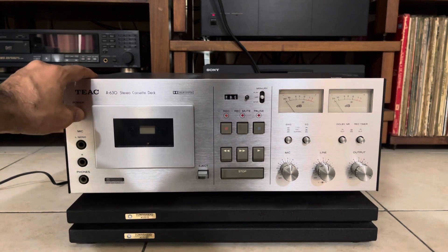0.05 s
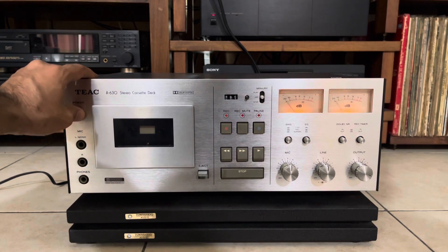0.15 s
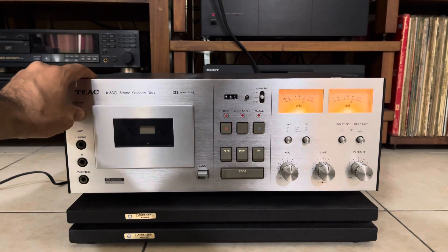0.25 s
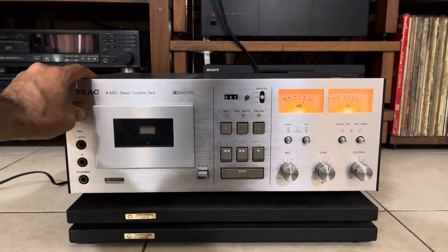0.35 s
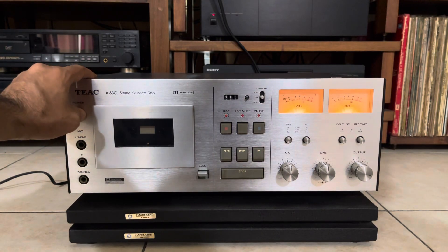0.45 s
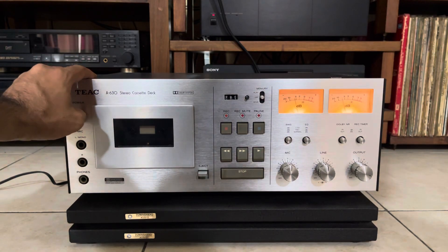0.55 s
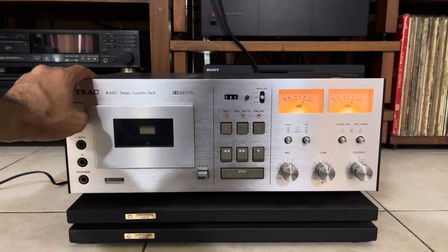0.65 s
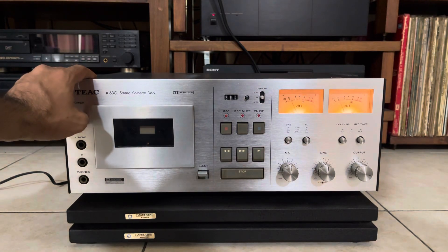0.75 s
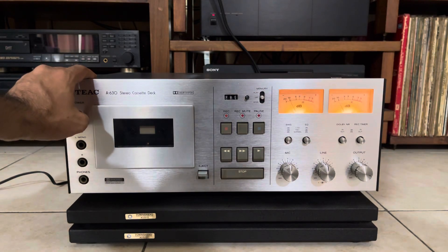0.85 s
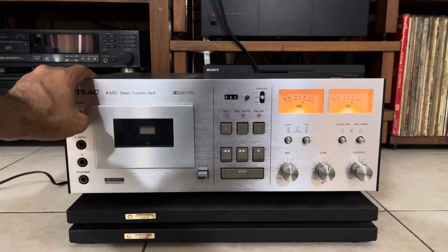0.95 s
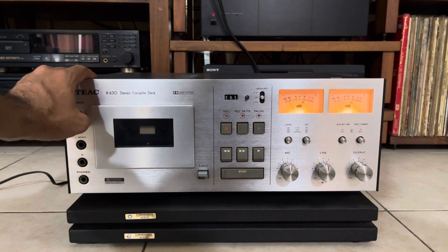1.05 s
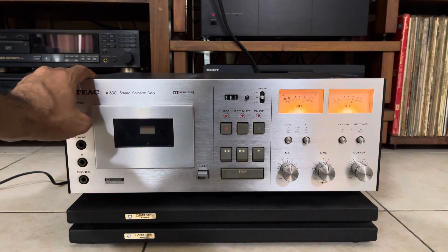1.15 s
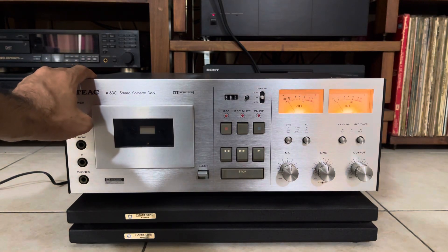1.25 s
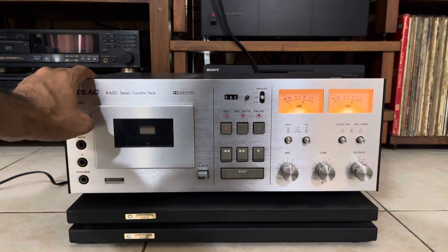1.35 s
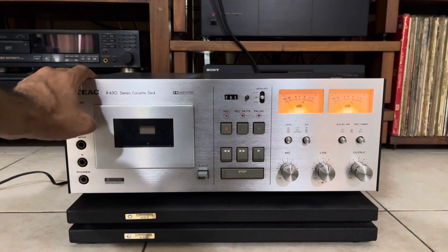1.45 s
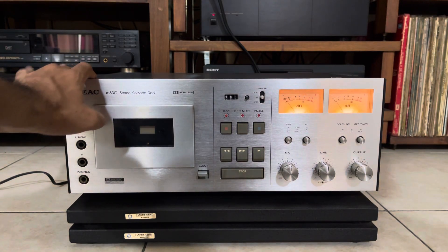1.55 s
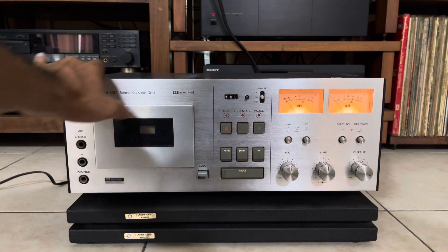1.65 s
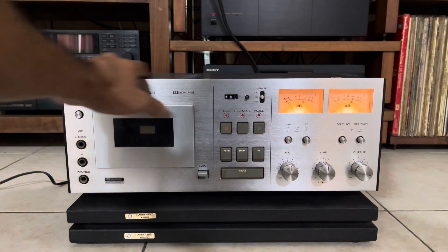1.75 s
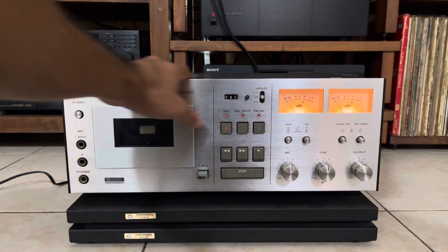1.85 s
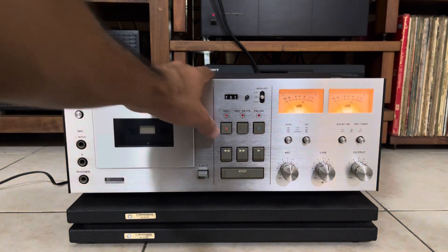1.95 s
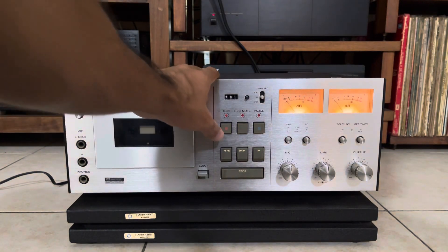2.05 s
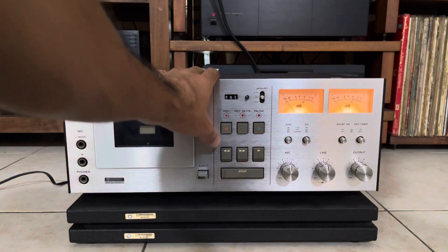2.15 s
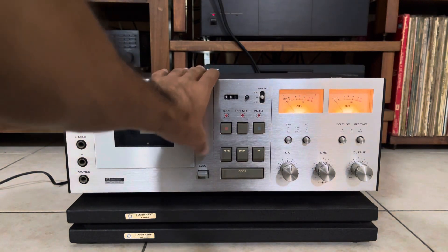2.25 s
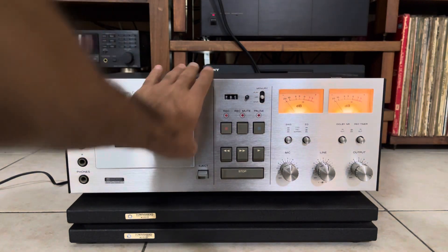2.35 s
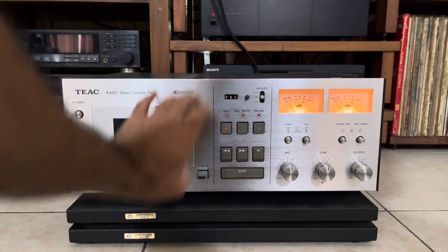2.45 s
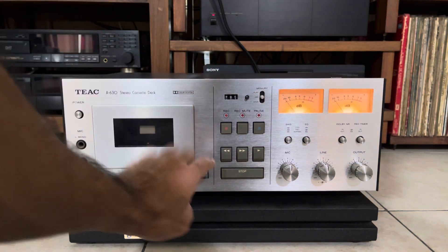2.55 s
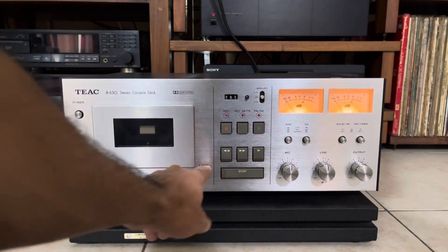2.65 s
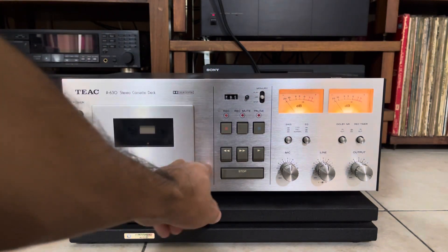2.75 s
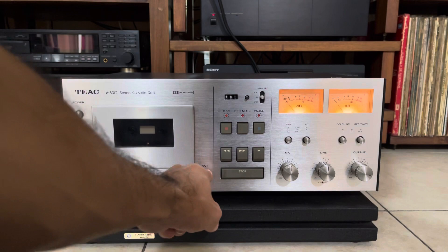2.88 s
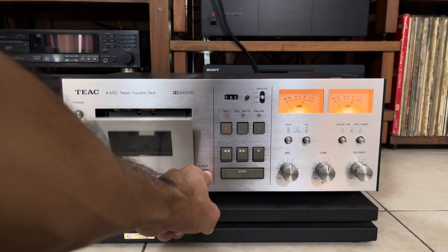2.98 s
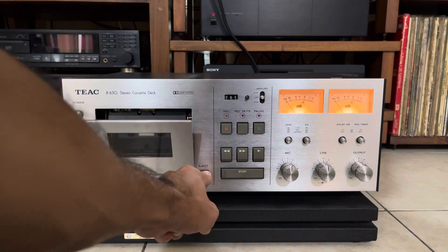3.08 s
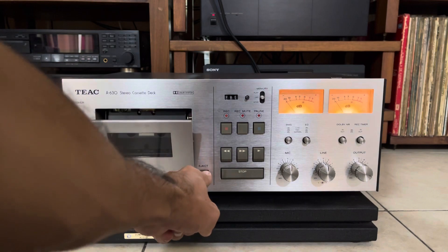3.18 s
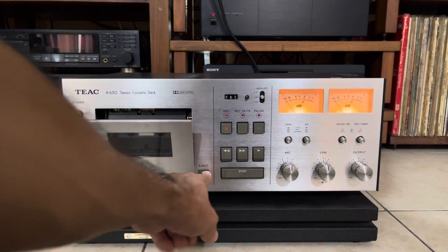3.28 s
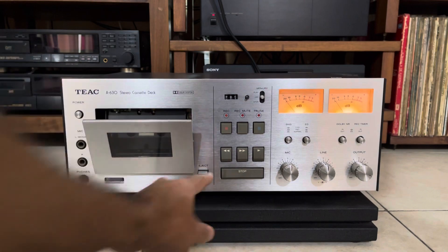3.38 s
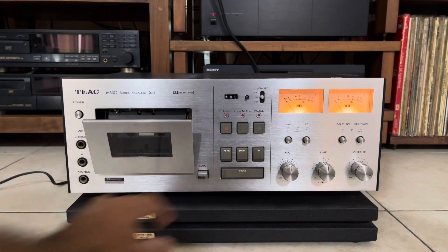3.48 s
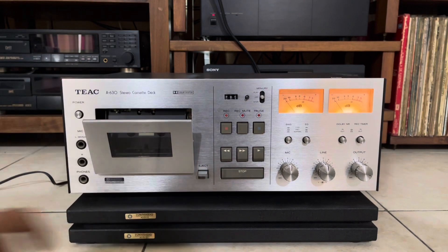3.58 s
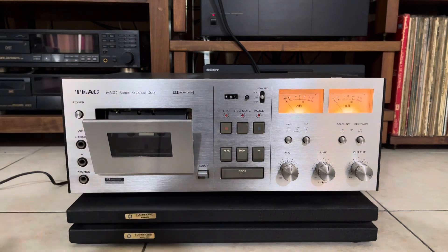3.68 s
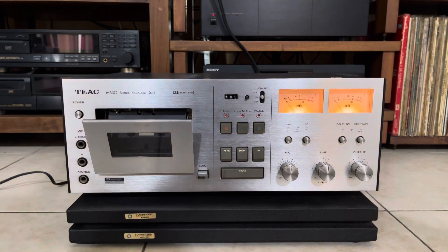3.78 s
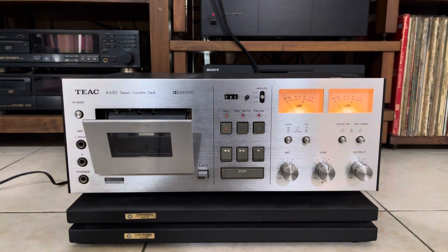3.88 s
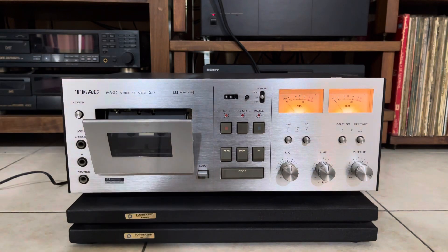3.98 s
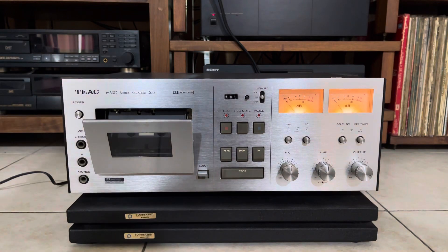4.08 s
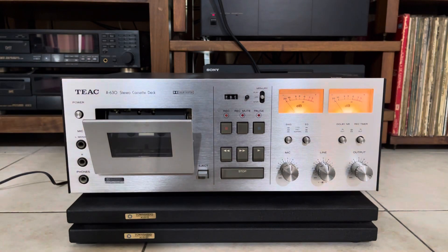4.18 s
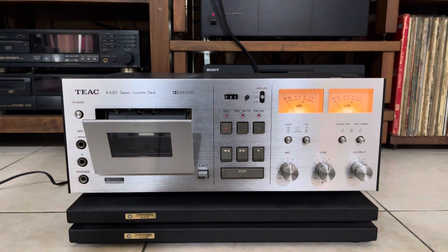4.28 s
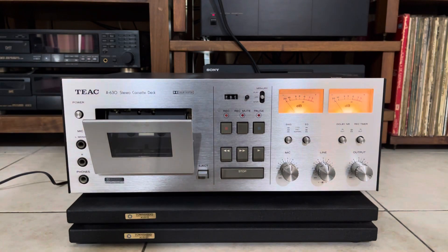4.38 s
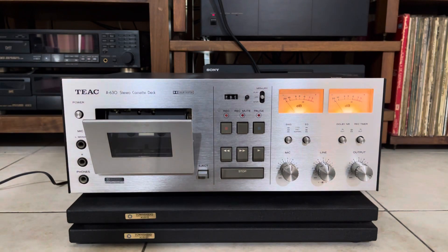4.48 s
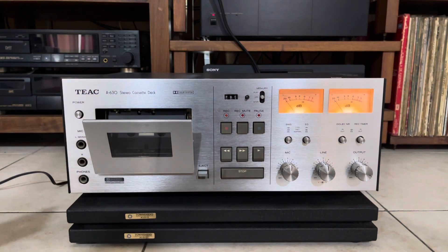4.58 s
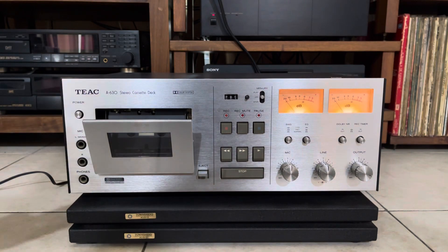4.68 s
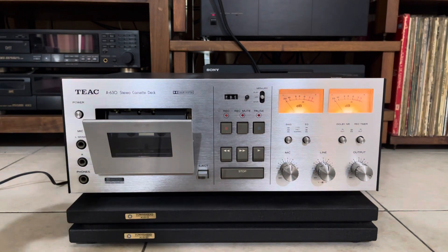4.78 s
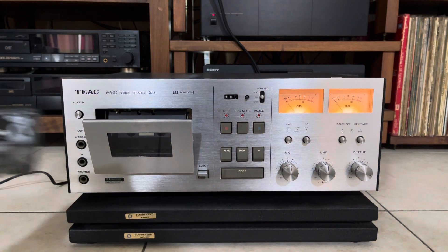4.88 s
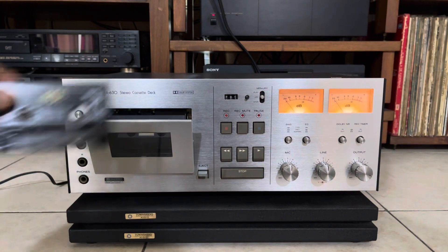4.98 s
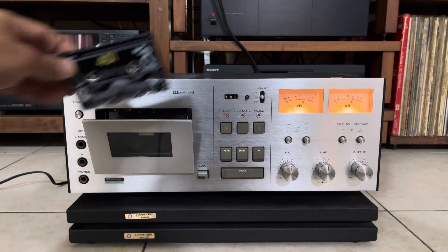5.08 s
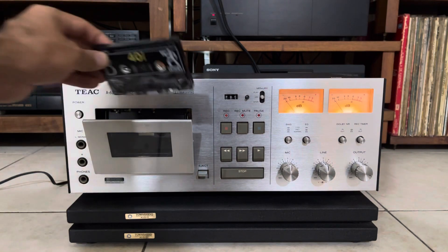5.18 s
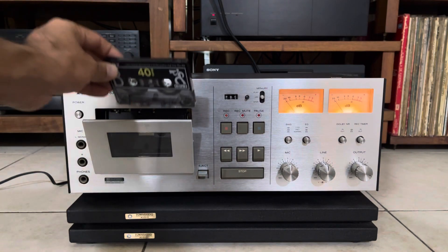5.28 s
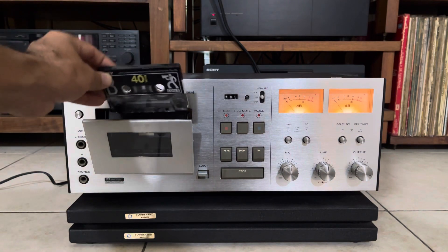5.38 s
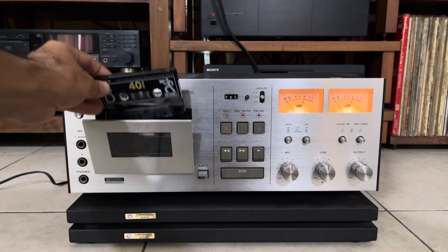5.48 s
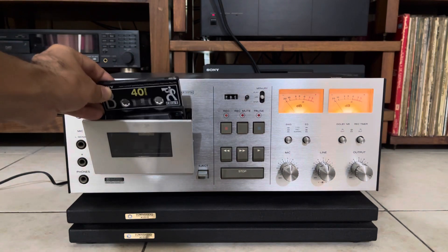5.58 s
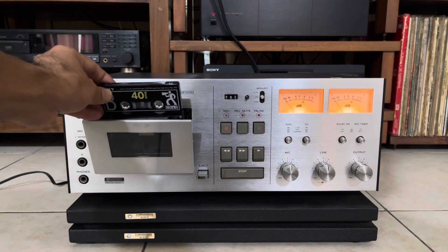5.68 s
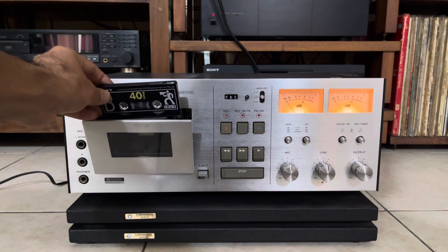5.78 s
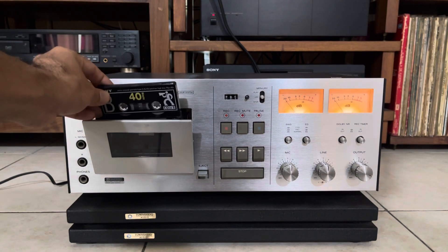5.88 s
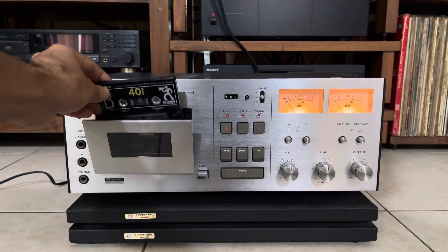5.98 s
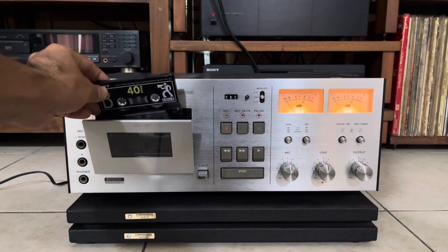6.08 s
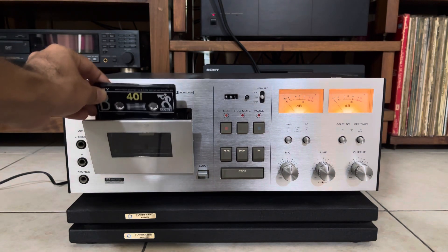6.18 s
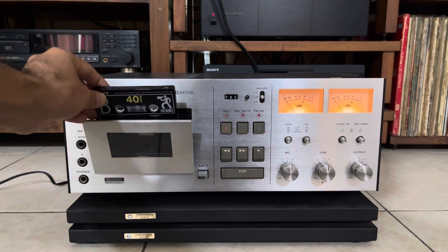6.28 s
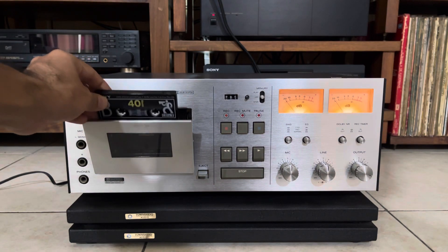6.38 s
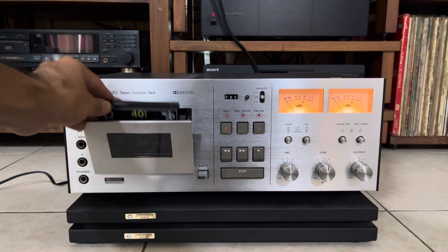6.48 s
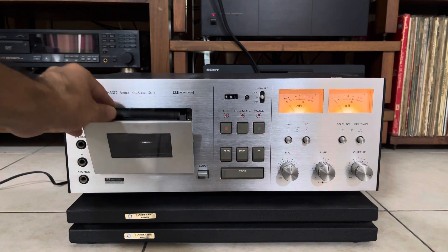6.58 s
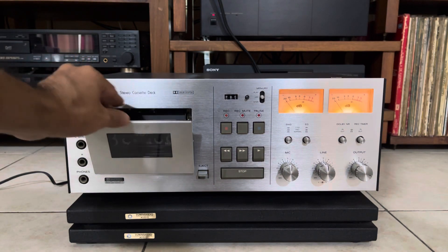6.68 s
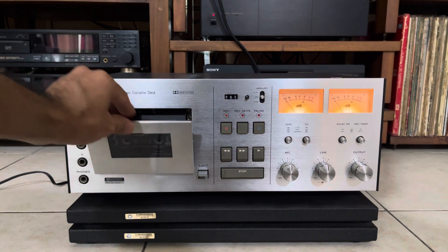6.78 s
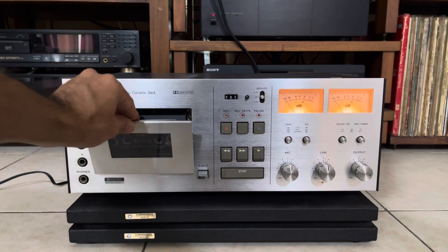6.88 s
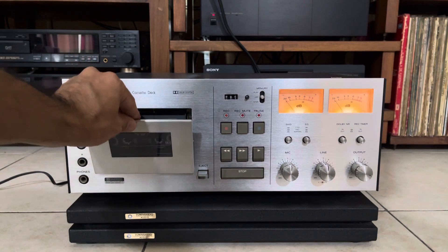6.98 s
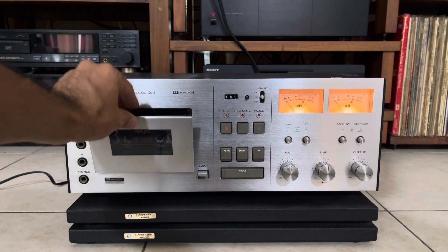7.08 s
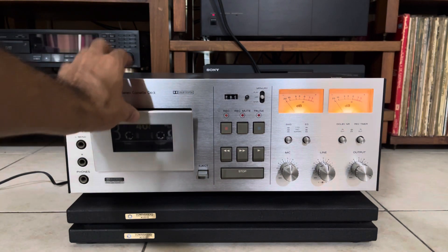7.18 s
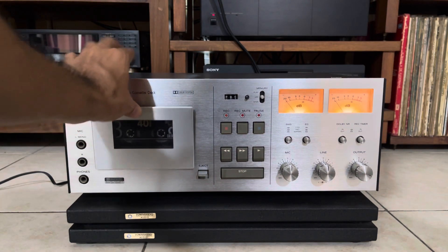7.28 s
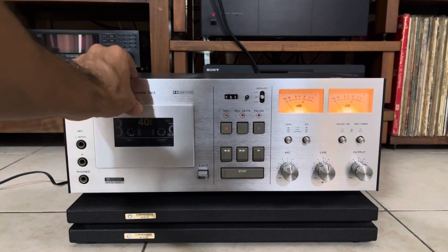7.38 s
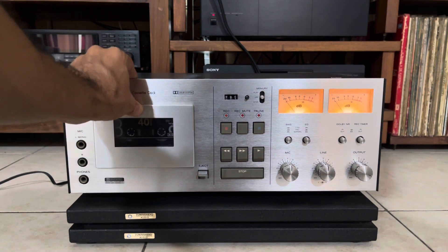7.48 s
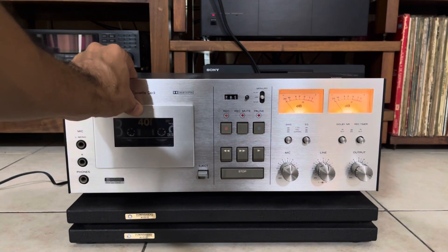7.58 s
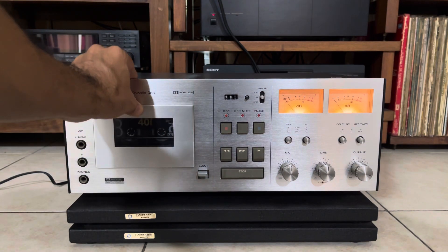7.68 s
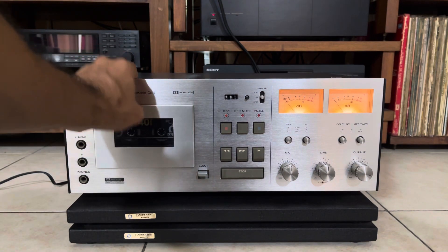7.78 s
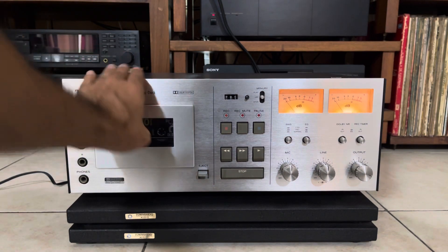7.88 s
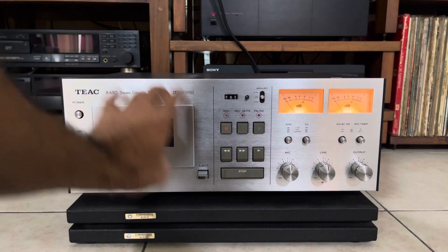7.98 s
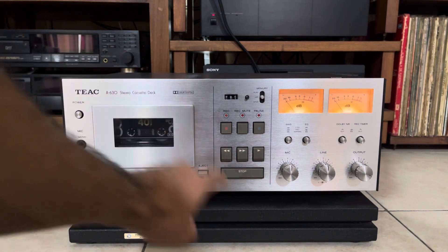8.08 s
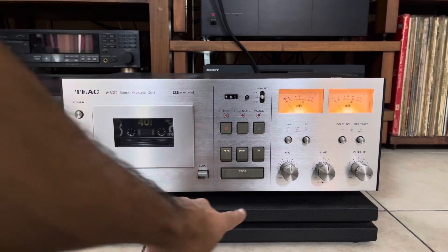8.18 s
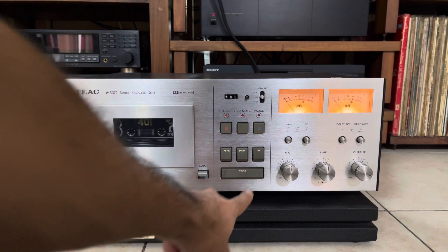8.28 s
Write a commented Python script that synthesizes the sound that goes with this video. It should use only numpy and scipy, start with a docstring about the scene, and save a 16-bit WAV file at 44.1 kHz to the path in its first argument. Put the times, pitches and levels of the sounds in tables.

```python
"""Air handling, building rumble and microphone hiss, all band-shaped noise, run throughout a quiet tiled room.
The power switch of a cassette deck clicks, low bumps begin and fingers brush the panel; the door unlatches
and drops open with a damper's whirr. A cassette rattles, knocks and slides into the holder, the door snaps
shut, and a last brush and bumps follow. Contacts and slides are noise through damped resonances, pings and
bumps are decaying sines; the contacts and slides also reverberate, and all is heard by a close stereo pair."""
import sys
import numpy as np
from scipy import signal
from scipy.fft import rfft, irfft, next_fast_len
from scipy.io import wavfile
from scipy.ndimage import uniform_filter1d, map_coordinates

SR = 44100
rng = np.random.default_rng(int(sys.argv[2]) if len(sys.argv) > 2 else 0)


def master_out(mix):
    """Clip the mix to full scale and print it as 16-bit PCM to the path in sys.argv[1]."""
    frames = np.transpose(np.atleast_2d(mix))
    ceiling = np.clip(frames, -1, 1)
    pcm = np.round(ceiling * 32767).astype(np.int16)
    wavfile.write(sys.argv[1], SR, pcm)


N = 368058  # length in samples


def amp(db):
    """Level as an amplitude ratio: 20 dB is a factor of ten."""
    return 10 ** (np.asarray(db) / 20)


def unit(x):
    """Normalization to a root-mean-square value of 1."""
    return x / np.sqrt(np.mean(x ** 2) + 1e-20)


def along(points, hz):
    """Interpolation of (Hz, value) points on a logarithmic frequency axis."""
    point_hz, value = np.transpose(points)
    return np.interp(np.log(hz + 1), np.log(point_hz + 1), value)


def wobble(rate):
    """Slow random modulation: a smooth curve through normal knots, rate knots a second."""
    knots = rng.standard_normal(int(N * rate / SR) + 4)
    return map_coordinates(knots, [np.arange(N) * rate / SR])


def filtered(x, response):
    """Linear filtering: the spectrum of x times a complex response of frequency."""
    m = next_fast_len(N + SR // 2)
    hz = np.fft.rfftfreq(m, 1 / SR)
    return irfft(rfft(x, m) * response(hz), m)[..., :N]


def ringing(x, modes):
    """Modal superposition: causal damped resonances in alternating sign, each passing its share of power."""
    m = next_fast_len(len(x) + SR // 16)
    f = np.fft.rfftfreq(m, 1 / SR)
    response = 0
    for k, (centre, width, db) in enumerate(modes):
        gain = (-1) ** k * amp(db) * np.sqrt(width * SR / np.pi)
        response = response + gain * 1j * f / (centre * centre - f * f + 1j * f * width)
    return irfft(rfft(x, m) * response, m)[:len(x)]


# Interchannel coherence of diffuse sound. Each row: frequency in Hz, left-right likeness from 0 to 1.
COHERENCE = [(60, .7), (150, 1), (380, 0.27), (950, 0.2), (2400, .6), (6000, 0.27), (8000, 0.32),
             (12000, 1)]


def paired(two, spectrum):
    """Partial coherence: two unrelated signals mixed as mid and side, with a spectrum in dB."""
    def response(hz):
        turn = np.arccos(np.clip(along(COHERENCE, hz), -1, 1)) / 2
        return amp(along(spectrum, hz)) * [np.cos(turn), np.sin(turn)]

    mid, side = filtered(two, response)
    return np.array([mid + side, mid - side])


def leaning(x, lean):
    """Interchannel level difference: half the left-right dB to each channel, by frequency."""
    return filtered(x, lambda hz: amp(np.outer([.5, -.5], along(lean, hz))))


# Left-right balance of diffuse noise. Each row: frequency in Hz, left minus right in dB.
DIFFUSE_LEAN = [(60, 1), (130, 1.5), (290, 6.5), (640, -1.5), (1410, 1.5), (3100, 5), (6820, 3.5),
                (15000, -3.5)]


def rush(spectrum):
    """Spectral shaping: diffuse stereo noise of the given power density, brought to rms 1."""
    return unit(leaning(paired(rng.standard_normal((2, N)), spectrum), DIFFUSE_LEAN))


# Noise spectra before the stereo balance. Each row: frequency in Hz, relative density in dB per Hz.
AIR_SPECTRUM = [(53, -32.5), (90, -1.5), (107, -8), (167, -3.5), (248, -6.5), (309, -12), (352, -15.5),
                (390, -18), (420, -17), (633, -22.5), (755, -14), (1140, -26), (1440, -26), (3000, -51.5),
                (3900, -84.5), (6600, -120)]
RUMBLE_SPECTRUM = [(12, -46), (20, -19.5), (48, -1.5), (72, 0.5), (100, -11.5), (140, -30), (200, -72)]
HISS_SPECTRUM = [(1500, -32), (2500, -11), (3100, -8.5), (6100, -9.5), (7200, -11.5), (8600, -7.5),
                 (10100, -12.5), (11600, -13), (12600, -27), (14000, -35.5), (16000, -38)]
# Depth of the rumble's level sway in dB, for curves of 1.5, 4 and 9 knots a second.
RUMBLE_SWAY_DB = (1.2, 1.8, 1.8)
AIR_DB, RUMBLE_DB, HISS_DB = -51.5, -54.5, -88  # levels before the sway


def background():
    """Stationary and modulated noise: air handling, a lumpier deep rumble, the microphone's steady hiss."""
    slow_db, mid_db, fast_db = RUMBLE_SWAY_DB
    air_db = AIR_DB + .6 * wobble(2.7) + 0.9 * wobble(14)
    rumble_db = RUMBLE_DB + slow_db * wobble(1.5) + mid_db * wobble(4) + fast_db * wobble(9)
    air = amp(air_db) * rush(AIR_SPECTRUM)
    rumble = amp(rumble_db) * rush(RUMBLE_SPECTRUM)
    return air + rumble + amp(HISS_DB) * rush(HISS_SPECTRUM)


PLATE_FOLLOWS = 0.42  # dB of plate ring per dB of weight


def contacts(table, modes, answer):
    """Impact excitation: a blow and spiky chatter; weight sets the body, the last column the band above 9.8 kHz."""
    out, t = np.zeros(N + SR), np.arange(SR // 8) / SR
    hz, width, share_db = np.transpose(modes)
    thud_db, low_db, plate_db, t60 = answer
    burst = amp(-60 * t / t60) * (1 - np.exp(-t / 0.001))
    blow = 0.81 * np.exp(-((t - .0006) / 0.00021) ** 2)
    for s, db, weight_db, top_db in table:
        # the chatter's level jumps every 32 samples
        spikes_db = 3.67 * rng.standard_normal(len(t) // 32 + 1).repeat(32)[:len(t)]
        chatter = rng.standard_normal(len(t)) * amp(spikes_db)
        low = weight_db + low_db
        plate = PLATE_FOLLOWS * weight_db + plate_db
        tilt_db = along([(320, weight_db + thud_db), (460, low), (1050, low), (1200, weight_db),
                         (1800, weight_db), (2200, plate), (4600, plate), (5100, 0), (9400, 0),
                         (9800, top_db)], hz)
        # each contact meets slightly different pitches and mode levels
        pitch_spot, level_spot = rng.standard_normal((2, len(hz)))
        struck = np.transpose([hz * (1 + 0.022 * pitch_spot), width, share_db + tilt_db + level_spot])
        excitation = amp(db) * (burst * chatter + blow) / 2
        out[round(s * SR):][:len(t)] += ringing(excitation, struck)
    return out[:N]


# Switch contacts. Each row: start in seconds, relative level in dB, weight (body knock re level) in dB,
# top-band level (above 9.8 kHz) re level in dB.
SWITCH_CONTACTS = [(0.0778, -75, 5, -28), (0.1446, -68, 8.5, -3), (0.1928, -40, -24, -10),
                   (0.2058, -56, -1, -10), (0.41, -41.5, -25.5, -7)]
# Damped resonances of the switch. Each row: nominal frequency in Hz, width in Hz, power share in dB.
SWITCH_MODES = [(255, 330, -2), (905, 590, 2), (1580, 670, 5), (2500, 1040, 2.5), (3250, 520, 4.5),
                (4360, 1600, 0), (5600, 1500, -17), (8270, 430, -6), (10160, 1400, 2), (10640, 650, 3.5),
                (13000, 900, 0)]
# The switch's answer, one row: thud near 250 Hz re weight in dB, low body near 700 Hz re weight in dB,
# plate near 3 kHz in dB before the weight's share, chatter t60 in seconds.
SWITCH_ANSWER = (6, 0, -5.5, 0.1)


def switch():
    """Impact and modal response: the power switch clicks."""
    return contacts(SWITCH_CONTACTS, SWITCH_MODES, SWITCH_ANSWER)


# Hard-wall decay. Each row: frequency in Hz, t60 in seconds.
ROOM_T60 = [(150, 0.19), (1000, 0.35), (4000, 0.41), (10000, 0.3)]


def room(x):
    """Reverberation: hard walls and tiles answer, with a decay time that depends on frequency."""
    out = np.zeros((2, N + 2 * SR))
    step = SR // 4
    for start in range(0, N, step):  # the hand moves, so the echo pattern changes
        hz, t, z = signal.stft(rng.standard_normal((2, SR // 2)), SR, nperseg=256)
        decay = amp(-60 * t / along(ROOM_T60, hz)[:, None])
        tail = signal.istft(z * decay, SR, nperseg=256)[1]
        tail = tail / np.linalg.norm(tail[0])
        wet = signal.fftconvolve(x[None, start:start + step], tail, axes=1)
        out[:, start + 300:][:, :wet.shape[1]] += wet  # 300 samples of first delay
    return paired(out[:, :N], [(200, 6.5), (1000, -7), (4000, -12.5), (10000, -15.0)])


# Soft low bumps. Each row: start in seconds, envelope peak in dB, frequency in Hz.
BUMPS = [(0.138, -38.5, 59.3), (2.524, -35.5, 49.7), (3.348, -37.5, 62.4), (4.18, -43.5, 75.4),
         (7.428, -35, 86), (7.558, -35, 55), (7.808, -35, 59.2), (7.992, -47.5, 67.5)]
THUMP_S = .011  # seconds to the envelope's peak


def thumps():
    """Heavily damped oscillation: soft bumps through shelf and floor, a swing or two of low pressure."""
    out, t = np.zeros(N + SR), np.arange(SR // 5) / SR
    swell = (t / THUMP_S) * np.exp(1 - t / THUMP_S)
    for s, db, hz in BUMPS:
        out[round(s * SR):][:len(t)] += amp(db) * np.sin(2 * np.pi * hz * t) * swell
    return out[:N]


def strokes(table):
    """Exponential envelope: the gain swells with pressure, holds, then fades."""
    t = np.arange(N) / SR
    gain = np.zeros(N)
    for s, held, db, swell, fade in table:
        gain += amp(db - swell * np.maximum(s - t, 0) - fade * np.maximum(t - s - held, 0))
    return gain


# Fingers brushing the panel. Each row: time of full pressure in seconds, hold in seconds,
# level in dB before flutter, swell in dB per second, fade in dB per second.
SKIN_STROKES = [(1.47, .015, -83, 160, 500), (1.672, 0.038, -65.5, 550, 400), (1.82, 0.039, -70.5, 400, 91),
                (2.32, .04, -75, 152, 260), (7.84, .01, -78, 170.5, 300)]
# Spectrum of the brushing. Each row: frequency in Hz, relative density in dB per Hz.
BRUSH_SPECTRUM = [(1500, 0), (2500, 4), (4900, -4), (5400, -2.5), (8700, 5.5), (10200, 9), (11800, 3),
                  (12600, -12), (14000, -40)]


def brushing():
    """Friction noise: skin on brushed metal hisses softly with a fluttering level."""
    return strokes(SKIN_STROKES) * amp(1.5 * wobble(60)) * rush(BRUSH_SPECTRUM)


# Door contacts. Each row: start in seconds, relative level in dB, weight in dB,
# top-band level (above 9.8 kHz) re level in dB.
DOOR_CONTACTS = [(2.734, -62, -4, -8), (2.7448, -65, 7, -20), (2.8455, -47, -12, 4),
                 (2.8885, -38.5, -12, -3.5), (2.895, -39, -5, -14), (2.9555, -35.5, -4.5, -5.5),
                 (3.303, -62, 0, -12), (3.3239, -32, -10.5, -10.5), (3.3266, -27.5, -11, -15.5),
                 (3.3347, -30, -14.5, -11.5), (3.3419, -35, -9, -5), (6.9998, -45.5, -11.5, -22),
                 (7.017, -31.5, -8.5, -20), (7.0328, -43.5, -11.5, -21), (7.0914, -45, -4.5, -21),
                 (7.1479, -31, -10, -16), (7.163, -42, -15, -18.5), (7.1847, -47.5, -2, -11),
                 (7.201, -38.5, -9.5, -10.5), (7.2262, -44, -9, -3.5), (7.2585, -35.5, -10.5, -16),
                 (7.3012, -26, -13, -18), (7.3217, -15, -8.5, -12), (7.3263, -15.5, -8.5, -17.5),
                 (7.339, -29.5, -3.5, -19.5), (7.352, -38.5, -0.5, -15), (7.6909, -68.5, 17, -17)]
# Damped resonances of the door. Each row: nominal frequency in Hz, width in Hz, power share in dB.
DOOR_MODES = [(195, 290, -4.5), (317, 140, -3.5), (435, 91, -7.5), (685, 41, -6), (941, 120, -9.5),
              (1220, 230, -2.5), (1584, 250, -3.5), (2270, 630, -2), (3333, 1500, 0), (4140, 850, -1),
              (5440, 1700, -10.5), (6600, 1410, -9.5), (8550, 1400, -7), (10080, 830, 2), (10800, 440, 2.5),
              (12200, 1000, -6.5)]
# The door's answer, one row: thud re weight in dB, low body re weight in dB, plate in dB,
# chatter t60 in seconds.
DOOR_ANSWER = (-5, -1.5, -6.5, 0.0912)


def door():
    """Impact and modal response: the door unlatches, drops open and later snaps shut."""
    return contacts(DOOR_CONTACTS, DOOR_MODES, DOOR_ANSWER)


# One part ringing alone. Each row: start in seconds, initial level in dB before the onset,
# frequency in Hz, t60 in seconds.
LONE_RINGS = [(2.957, -36.5, 661, 0.068), (2.968, -33.5, 245, 0.066), (3.308, -69, 5400, .03),
              (3.329, -34.5, 1547, 0.05), (3.394, -48, 5400, 0.025), (4.19, -52, 1454, 0.089),
              (4.268, -50.5, 554, 0.08), (5.494, -54.5, 1486, 0.15), (5.044, -42.5, 1200, 0.025),
              (6.609, -18, 1780, 0.024), (7.203, -33.5, 4120, 0.011), (7.322, -16, 942, 0.033),
              (7.332, -28.5, 320, 0.074), (7.345, -35, 190, 0.13), (7.42, -48, 6500, 0.046)]


def pings():
    """Free vibration: a single spring or panel rings at its own pitch and decays exponentially."""
    out, t = np.zeros(N + SR), np.arange(SR // 10) / SR
    onset = 1 - np.exp(-t / .001)
    for s, db, hz, t60 in LONE_RINGS:
        out[round(s * SR):][:len(t)] += amp(db - 60 * t / t60) * onset * np.sin(2 * np.pi * hz * t)
    return out[:N]


# The damper turning. Each row: time of full level in seconds, hold in seconds, level in dB,
# swell in dB per second, fade in dB per second.
WHIRR_STROKES = [(3.16, .06, -81, 200, 200)]
# Spectrum of the whirr. Each row: frequency in Hz, relative density in dB per Hz.
DAMPER_SPECTRUM = [(2300, -23), (3000, -10), (3800, -5), (4100, -21), (5000, -60)]


def damper():
    """Band-limited noise: the falling door's damper whirrs."""
    return strokes(WHIRR_STROKES) * rush(DAMPER_SPECTRUM)


# Cassette contacts. Each row: start in seconds, relative level in dB, weight in dB,
# top-band level (above 9.8 kHz) re level in dB.
CASSETTE_CONTACTS = [(4.0585, -72, 3, -9), (4.127, -51, 4, -19), (4.1326, -47, 2, -21),
                     (4.1631, -49.5, -1, -10), (4.1685, -40, -13, -7), (4.1815, -43.5, -7, -8),
                     (4.262, -44, -18, -3), (4.2732, -42, -29, -17), (4.3065, -43, -11, -13),
                     (4.455, -50.5, -13, -27), (4.4632, -46, -12.5, -27), (4.4805, -49, -3, -30),
                     (4.4917, -58, -2, -25), (4.6534, -79, 23.5, -15), (4.816, -31, -20, -12),
                     (4.8362, -35.5, -16, -22), (4.8455, -45.5, -5, -19), (5.0436, -63, 14, -16),
                     (5.0564, -51.5, -3.5, -37), (5.1208, -37.5, -13.5, -28), (5.1674, -48, -9, -33),
                     (5.49, -54, 0, -28), (5.5633, -35.5, -13.5, -21), (5.5743, -36, -8, -18),
                     (5.5867, -39.5, -2, -19), (5.6959, -42.5, 7.5, -22), (5.7083, -35, -5, -12),
                     (5.7246, -36.5, -11, -15), (5.7575, -38, -17, -12), (5.7771, -32.5, -18, -17),
                     (5.795, -44.5, -5, -20), (5.8224, -55, -2, -21), (5.8592, -41, 1, -28),
                     (5.869, -42, -9, -23), (5.925, -43, -15, -23), (5.9463, -37.5, -11.5, -22),
                     (5.9546, -30, -16, -17), (5.9684, -37.5, -13, -27), (5.982, -44.5, -10.5, -27),
                     (6.1437, -56, -4, -23), (6.1476, -40.5, -13, -33), (6.167, -54.5, -1.5, -10.5),
                     (6.1927, -23.5, -10, -22.5), (6.2043, -26, -13.5, -22), (6.2164, -23.5, -13.5, -16),
                     (6.24, -35.5, -6, -13), (6.252, -40, -6.5, -17), (6.3706, -54, 0, -22),
                     (6.4443, -21.5, -12.5, -14), (6.4635, -12, -17, -18), (6.4751, -15, -14.5, -19),
                     (6.4936, -30.5, -15, -15), (6.5196, -29.5, -19, -12.5), (6.553, -34, -15, -18.5),
                     (6.575, -26, -17, -20), (6.5982, -18, -16.5, -12.5), (6.6081, -9.5, -10, -14.5),
                     (6.6133, -20.5, -6.5, -15), (6.6274, -26, -6, -16), (6.6481, -26.5, -11, -17.5),
                     (6.665, -23.5, -13, -12), (6.692, -22.5, -14.5, -13.5), (6.7111, -25.5, -16.5, -15.5),
                     (6.7278, -31.5, -12.5, -2), (6.7424, -35.5, -13, -12), (6.8573, -37.5, -8.5, -25),
                     (6.8663, -44, -8, -32)]
# Damped resonances of the shell. Each row: nominal frequency in Hz, width in Hz, power share in dB.
SHELL_MODES = [(168.4, 26, -2.5), (300, 510, -1.5), (460, 34, -7), (660, 49, -2.5), (956, 85, -2.5),
               (1300, 260, -3.5), (1680, 290, 0), (2490, 410, 3.5), (3570, 810, 3), (4230, 870, -1),
               (5680, 1100, -8.5), (6550, 780, -5.5), (6790, 470, -5), (8090, 544, -7.5), (9533, 540, 0.5),
               (10840, 330, 7.5), (11900, 1200, 2)]
# The shell's answer, one row: thud re weight in dB, low body re weight in dB, plate in dB,
# chatter t60 in seconds.
SHELL_ANSWER = (-10, -3.5, -8.5, 0.0376)


def cassette():
    """Impact and modal response: the cassette rattles in the hand and knocks on the holder."""
    return contacts(CASSETTE_CONTACTS, SHELL_MODES, SHELL_ANSWER)


# Plastic sliding. Each row: start in seconds, length in seconds, drive at start in dB, drive at end in dB.
SLIDES = [(4.119, .2, -65, -65.5), (5.487, 0.028, -68.5, -68.5), (6.199, .055, -44.5, -52),
          (6.437, 0.15, -42.5, -50.5), (6.594, 0.14, -38.5, -48.5), (7.001, .14, -60.5, -72),
          (7.198, .085, -65.5, -56)]
LET_GO_DB_PER_S = 650  # fall of the drive after the end, before smoothing


def sliding():
    """Friction excitation: dense uneven grains of plastic on plastic drive the shell, then die fast."""
    t = np.arange(N) / SR
    press = np.zeros(N)
    for s, length, first_db, last_db in SLIDES:
        knots = [s, s + length, s + length + 1]
        drive_db = np.interp(t, knots, [first_db, last_db, last_db - LET_GO_DB_PER_S])
        press += (t >= s) * amp(drive_db)
    grip_db = 2.5 * wobble(400) + 3.2 * wobble(150)
    grains = unit(rng.standard_normal(N) * amp(grip_db))
    grains = grains * uniform_filter1d(press, size=SR // 200)
    tilt = [(300, -18.5), (1000, -3.5), (3000, -12.0), (6000, 3.0), (9500, -4.5), (11000, -13.0)]
    return ringing(grains, [(hz, width, db + along(tilt, hz)) for hz, width, db in SHELL_MODES])


# The deck sits to the left. Each row: frequency in Hz, left minus right in dB.
NEAR_LEAN = [(300, 1), (1000, 6.5), (2400, 7.5), (3800, 8.5), (5800, 6), (7200, 6), (8600, -1.5),
             (10000, 2)]
# Colour of the microphone ports. Each row: frequency in Hz, gain in dB.
PORT_COLOUR = [(11000, 3.5), (12000, -2), (12800, -10), (13500, -31.5), (16000, -35)]


def scene():
    """Superposition: direct and reverberant deck sounds over the background."""
    deck = switch() + door() + cassette() + sliding()
    direct = leaning(deck + pings(), NEAR_LEAN)
    near = filtered(direct + room(deck), lambda hz: amp(along(PORT_COLOUR, hz)))
    return near + brushing() + damper() + thumps() + background()


# Phase between the microphone ports. Each row: frequency in Hz, lead of left over right in radians.
PORT_LEAD = [(1000, 0), (2400, .9), (3100, 1.2), (4500, .2), (6500, 0), (7900, .55), (8600, -.1),
             (9300, -1.7), (10000, -2.8), (10700, -3.7), (11400, -5.2), (12100, -6.28), (12800, -6.4),
             (13500, -9)]
TOP_HZ = 16400  # band limit


def record(dry):
    """Interchannel phase: the two ports shift against each other; the band limit removes all above."""
    def response(hz):
        phase = np.outer([.5, -.5], along(PORT_LEAD, hz))
        return np.exp(1j * phase) * (hz < TOP_HZ)

    return filtered(dry, response)


dry = scene()
out = record(dry)
master_out(out)
```